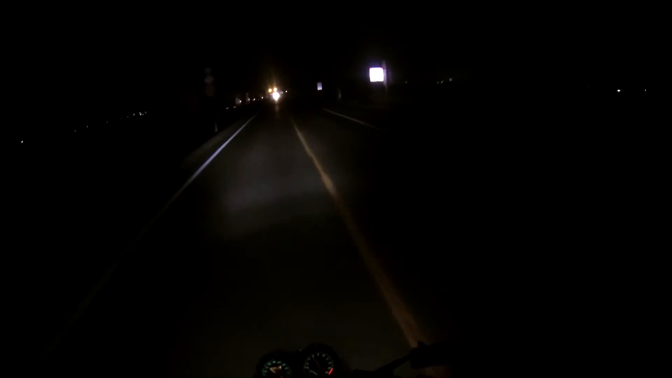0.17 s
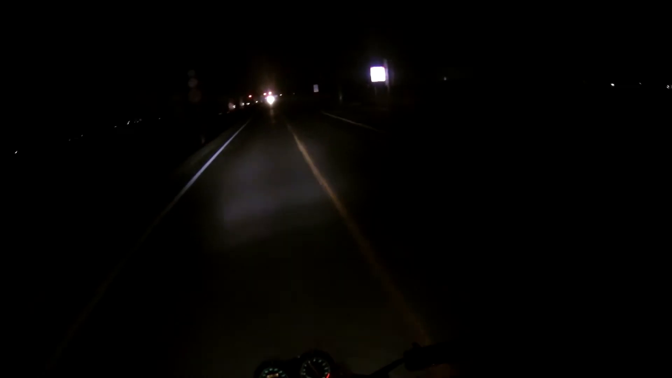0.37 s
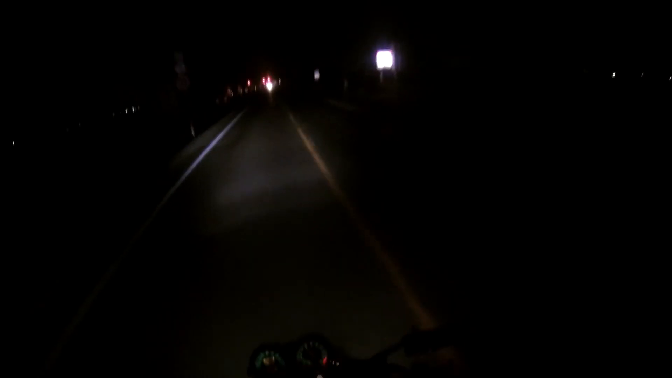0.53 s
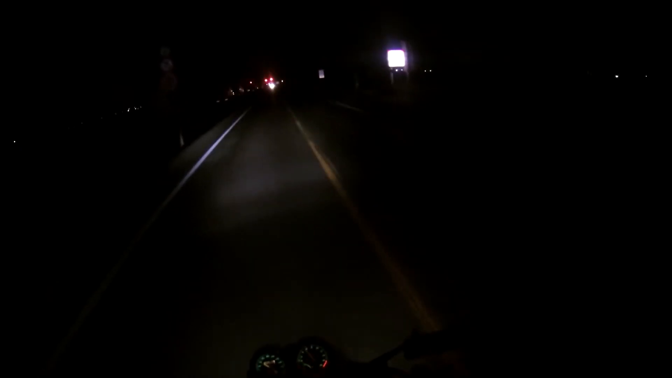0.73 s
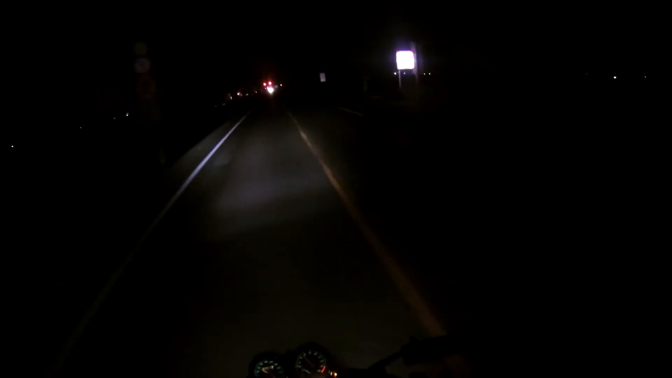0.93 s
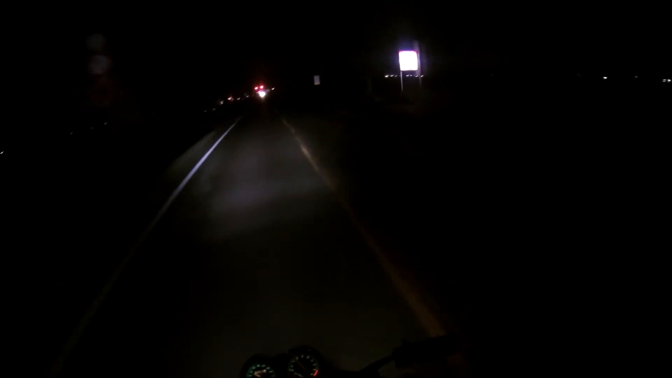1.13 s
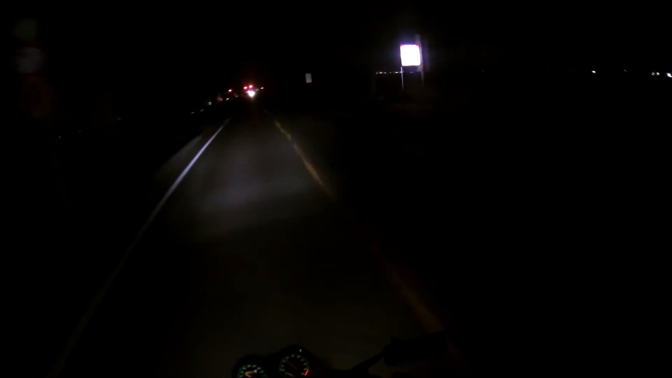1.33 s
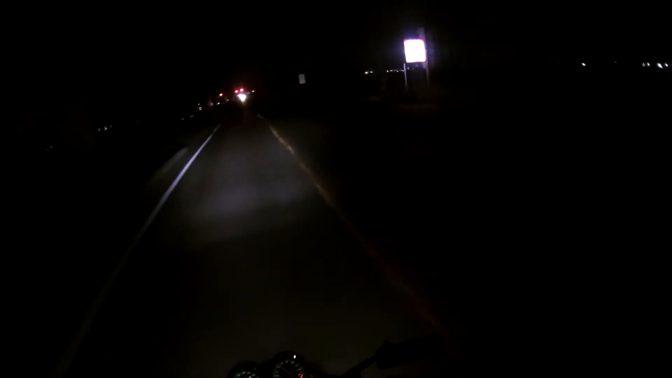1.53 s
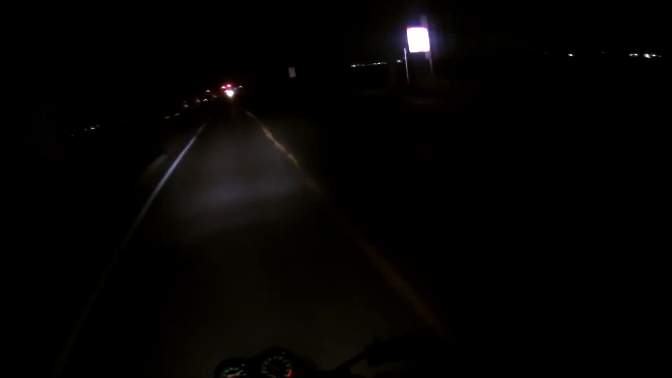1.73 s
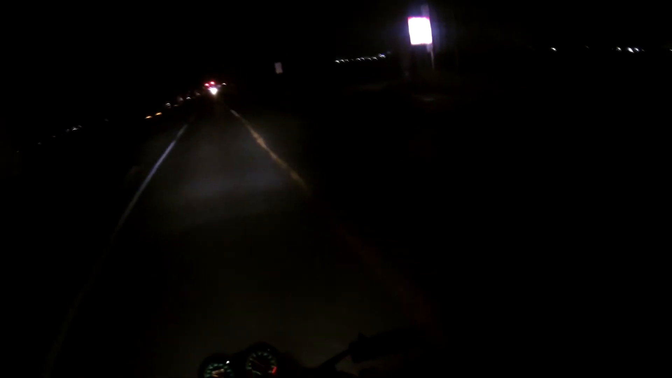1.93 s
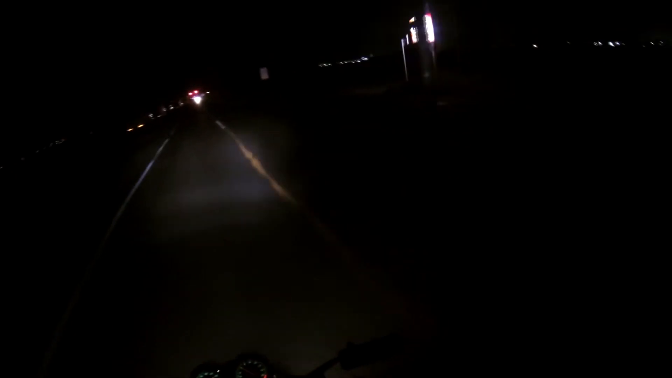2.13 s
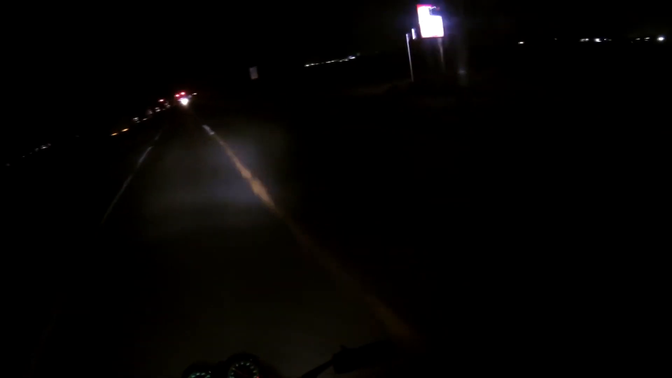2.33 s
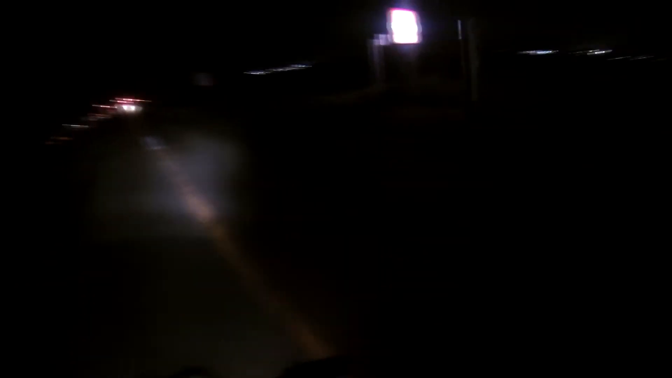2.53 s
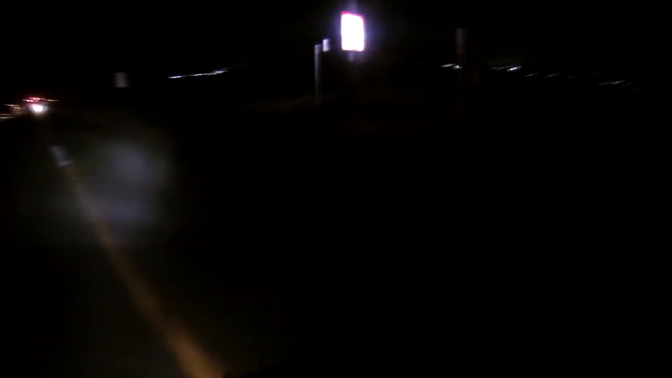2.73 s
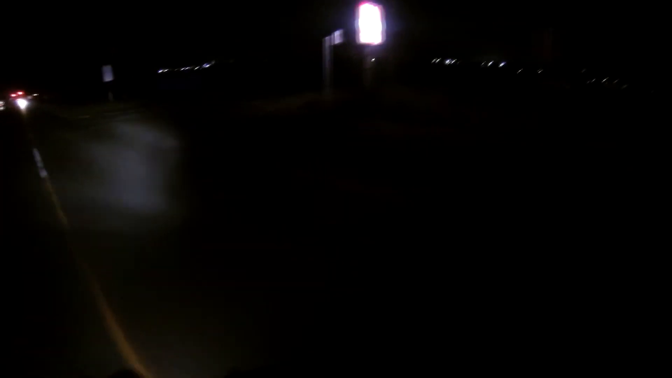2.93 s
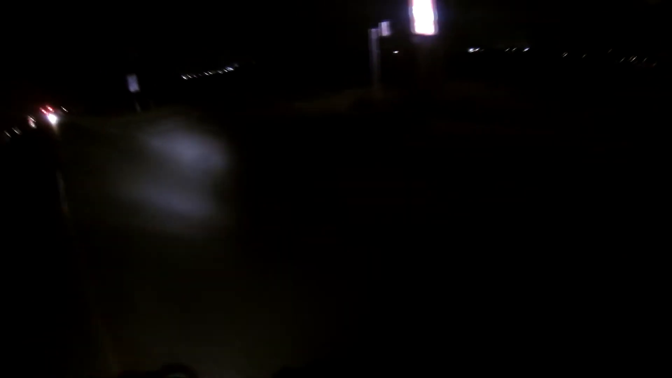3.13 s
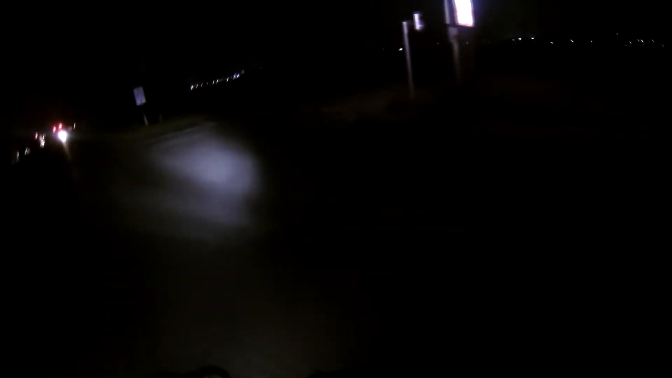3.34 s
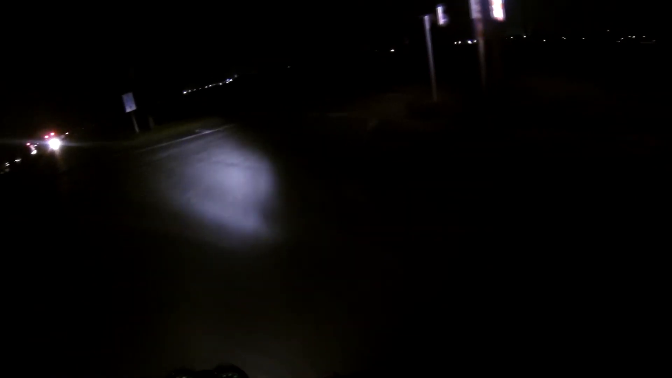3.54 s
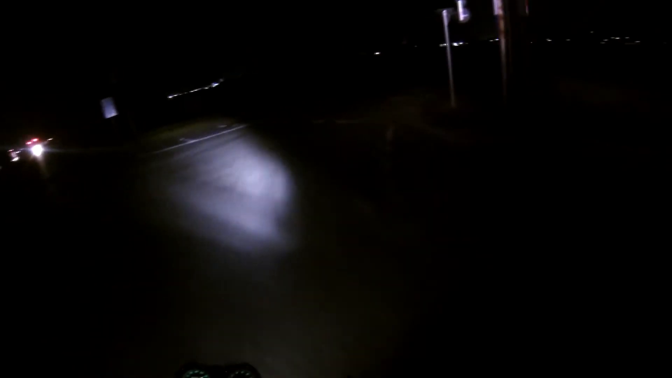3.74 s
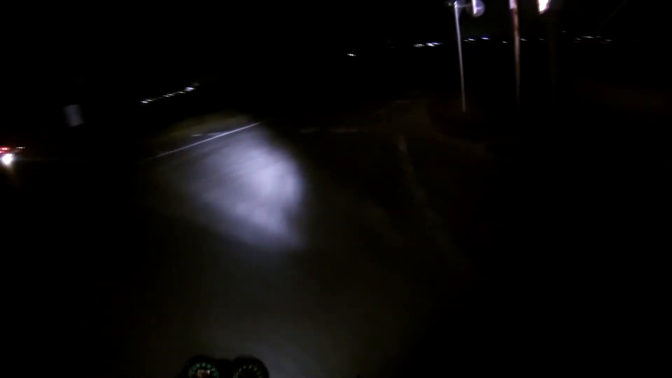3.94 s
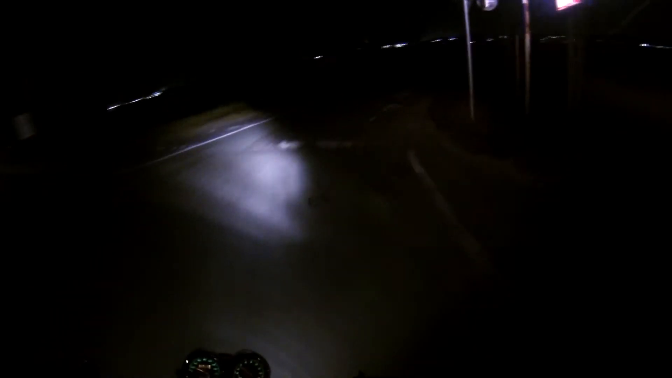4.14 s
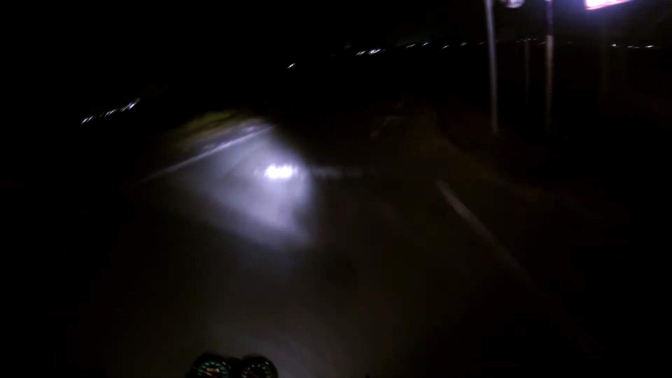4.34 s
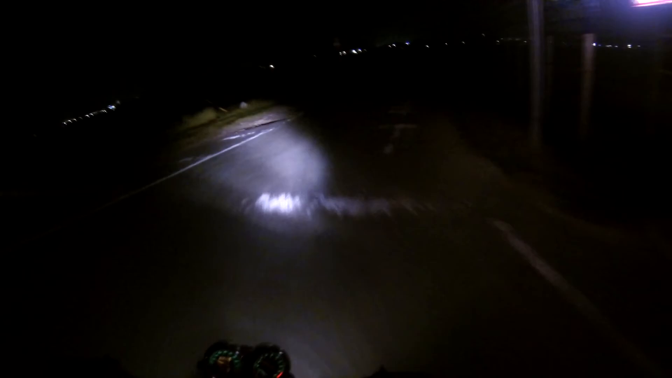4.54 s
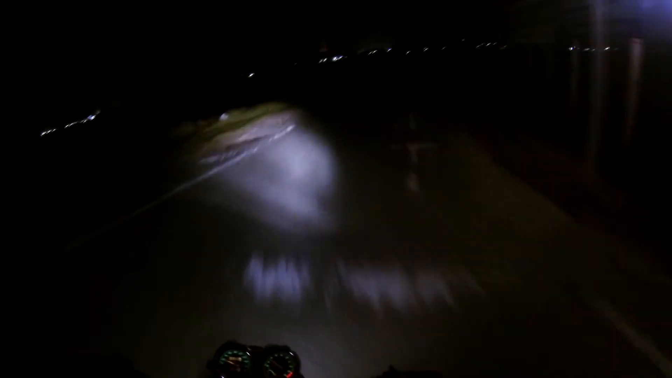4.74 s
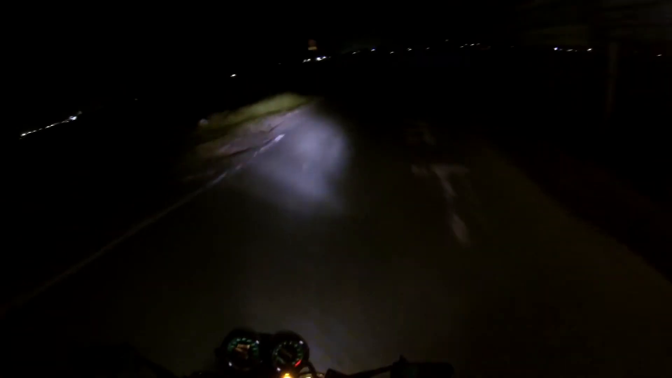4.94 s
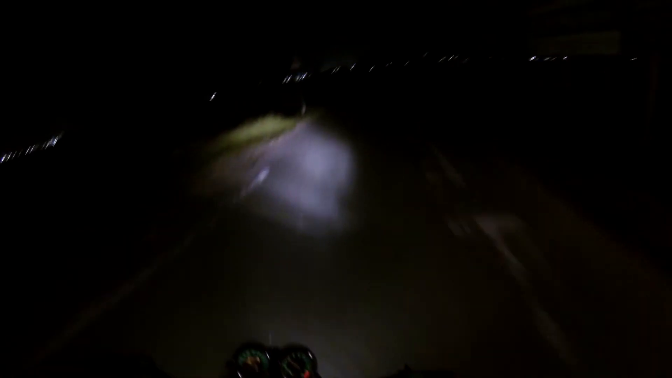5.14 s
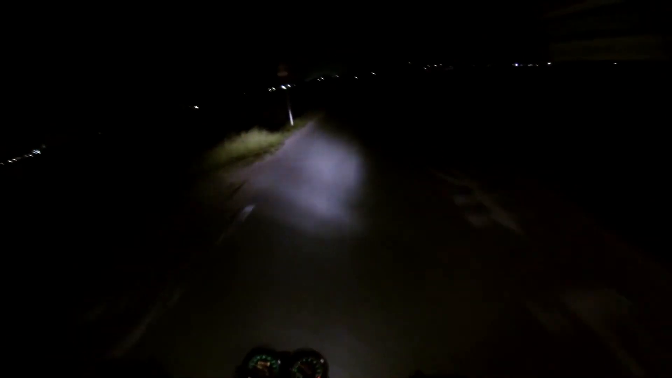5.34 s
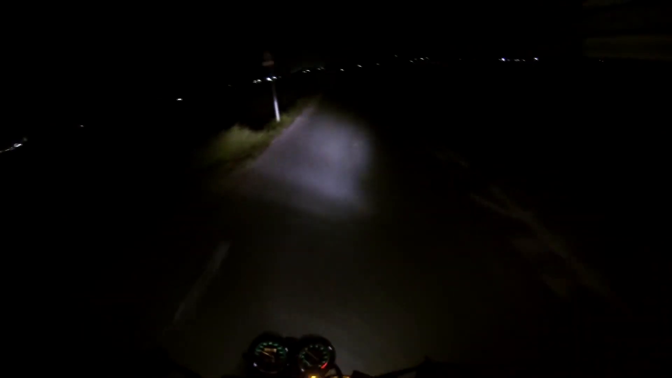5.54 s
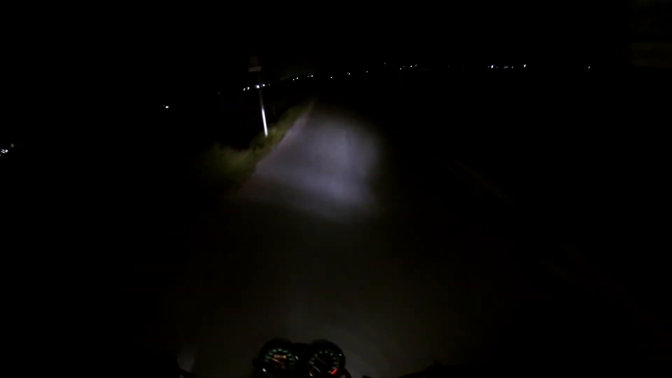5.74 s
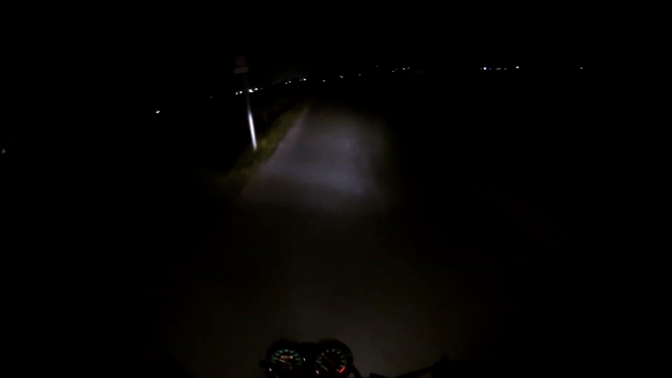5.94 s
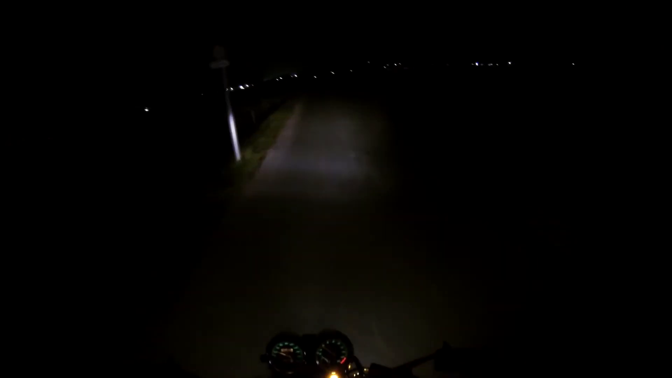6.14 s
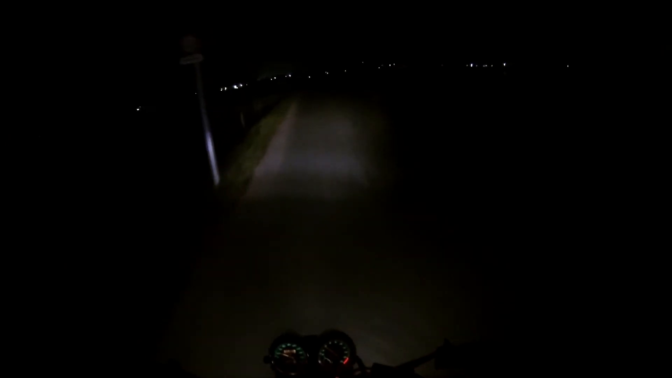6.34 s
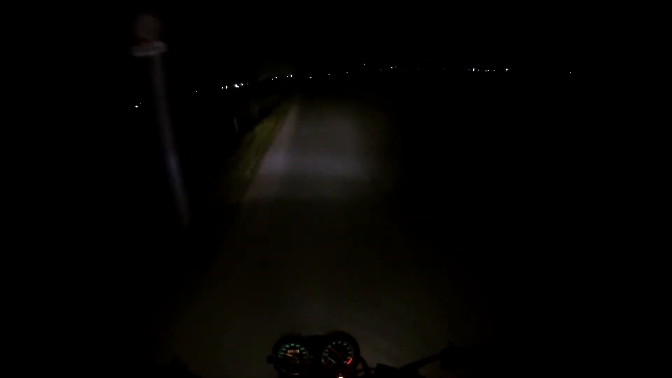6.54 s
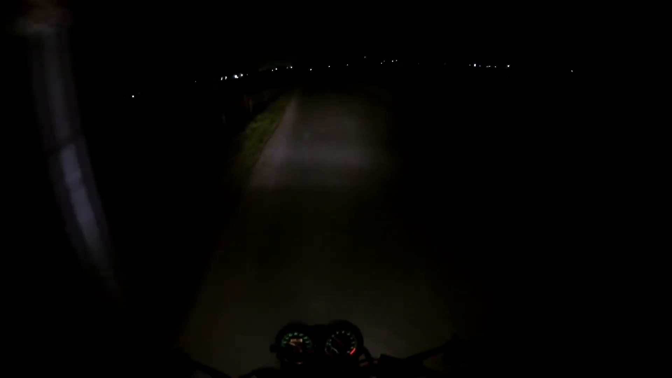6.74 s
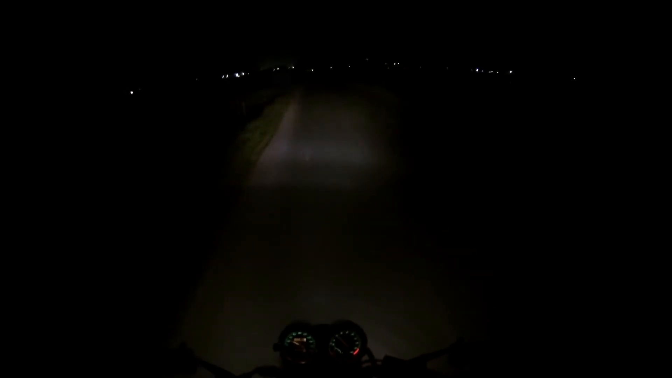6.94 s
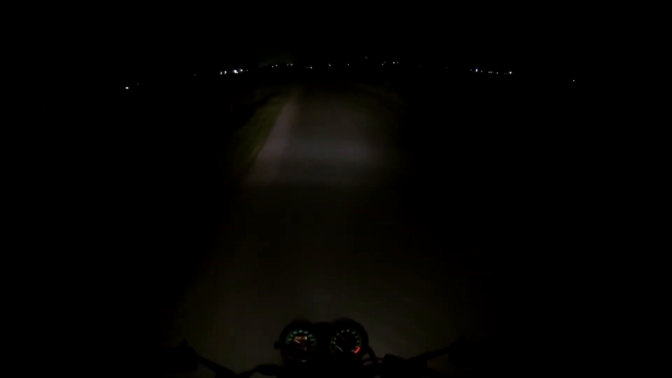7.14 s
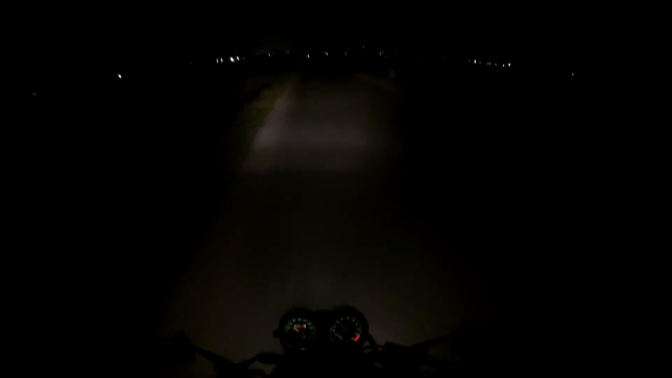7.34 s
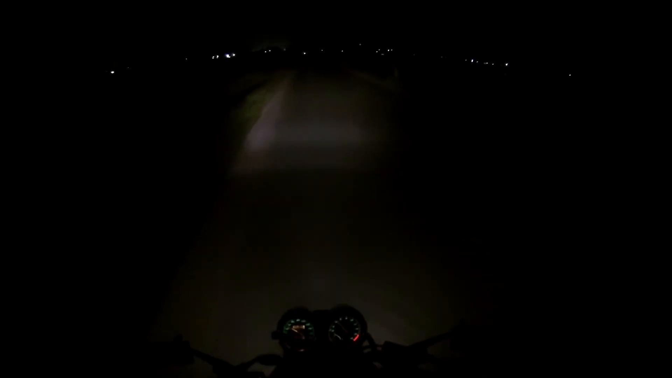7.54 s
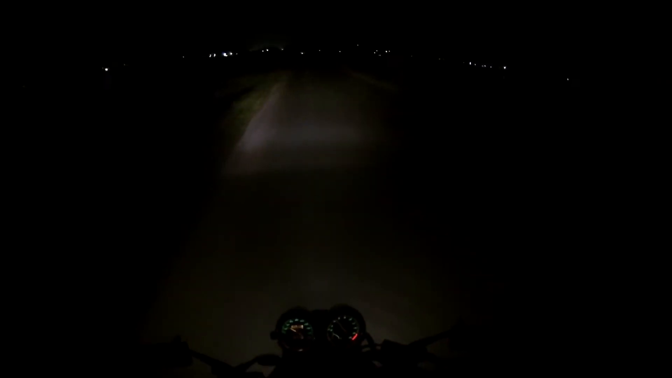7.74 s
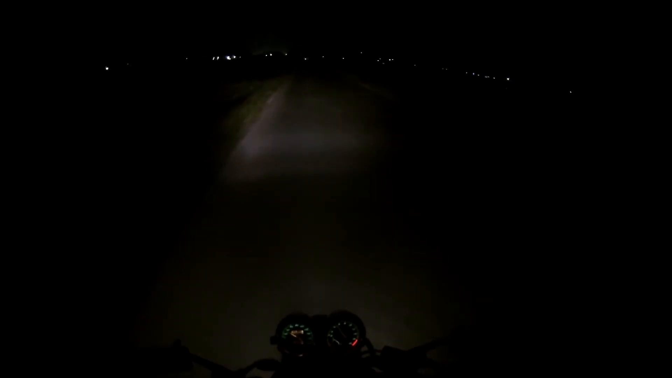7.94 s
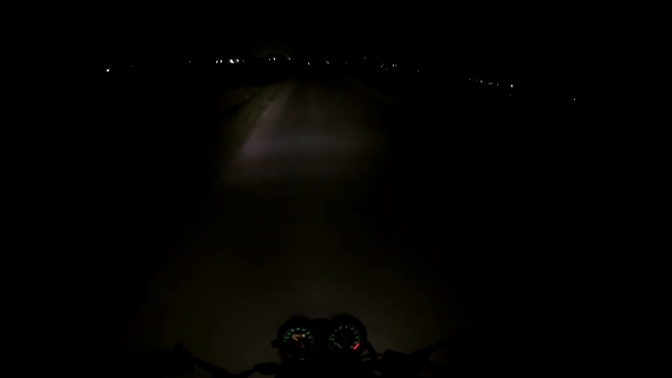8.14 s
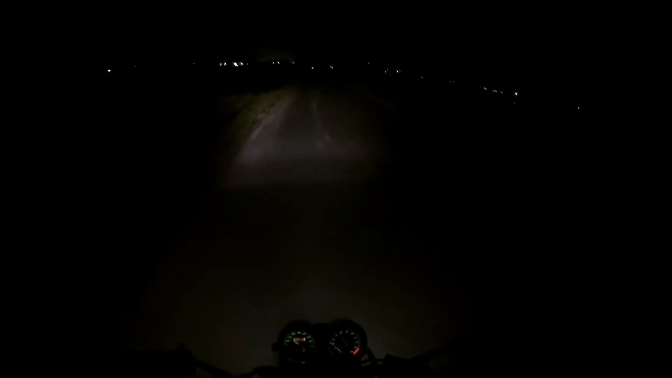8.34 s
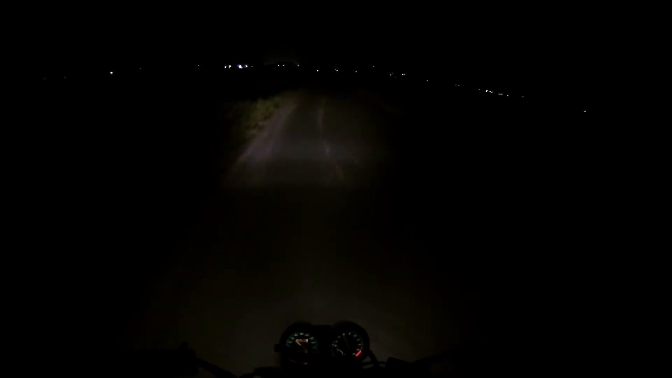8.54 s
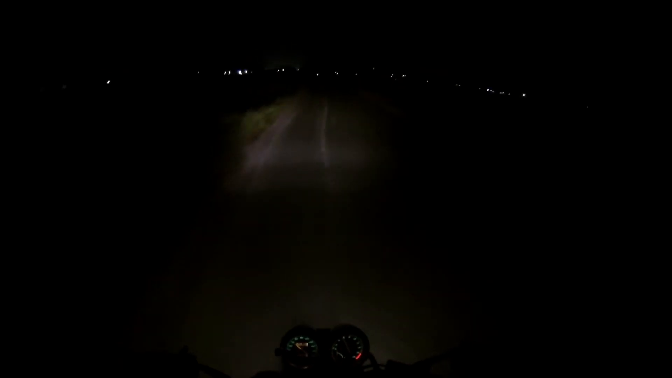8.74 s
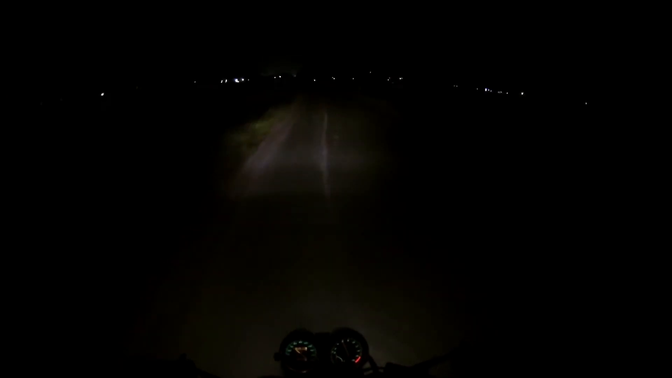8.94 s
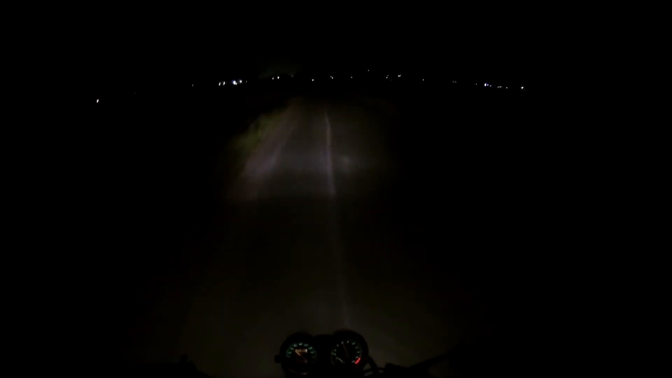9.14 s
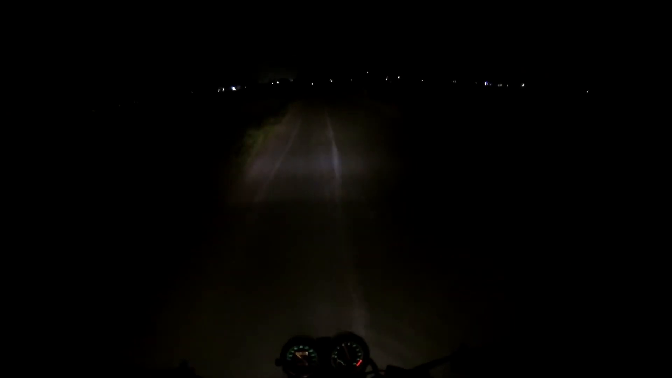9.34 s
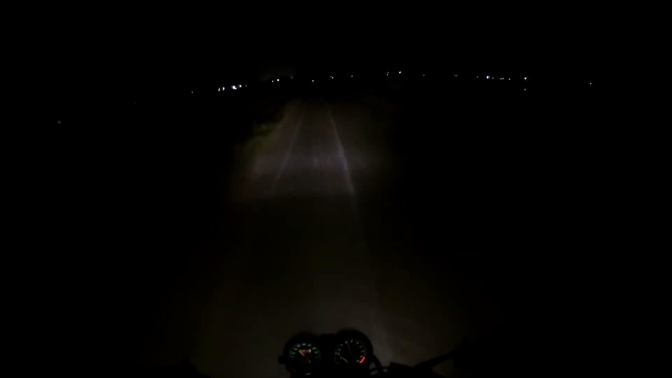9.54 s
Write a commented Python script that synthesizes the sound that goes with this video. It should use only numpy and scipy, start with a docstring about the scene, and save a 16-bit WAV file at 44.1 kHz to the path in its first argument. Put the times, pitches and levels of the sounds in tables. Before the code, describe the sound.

From the rider's helmet: wind rush fades as a motorcycle coasts down with a burbling exhaust, jerks lightly onto the throttle and accelerates smoothly.

```python
"""On the road, at the rider's helmet: a four-cylinder motorcycle coasts down into a turn, takes up the throttle
with a small jerk and pulls steadily away in one gear. Pulses of firing ring the exhaust, air box and hard
edge; gear tones whine, noise clatters as valves, and random knocks chink as the chain. Shaped noise makes
the wind's hiss and buffets and a soft brake rub. Brief tones sound, and one sharp tick on leaving the turn."""
import sys
import numpy as np
from scipy import signal
from scipy.fft import rfft, irfft
from scipy.io import wavfile
from scipy.ndimage import uniform_filter1d

SR = 44100
rng = np.random.default_rng(int(sys.argv[2]) if len(sys.argv) > 2 else 0)


def dump(signal):
    """Clip the signal to [-1, 1] and save it as 16-bit WAV at the path in sys.argv[1]."""
    limited = np.clip(np.atleast_2d(signal).T, -1, 1)
    pcm = np.round(limited * 32767).astype(np.int16)
    wavfile.write(sys.argv[1], SR, pcm)


N = 426888
T = np.arange(N) / SR  # time, s

# engine speed, jerking as the throttle takes up the slack of the chain: time_s, firing_rate_hz
ENGINE_SPEED = [(0, 184.6), (0.9, 160.9), (1.7, 137.2), (2.45, 122.8), (2.9, 118.4), (3.4, 110.9),
                (4.38, 105.6), (4.52, 116.4), (4.58, 101.4), (4.67, 108.1), (5.05, 110.2), (5.7, 117.6),
                (6.4, 127.8), (7.2, 146.1), (8.3, 173.6), (9.68, 207.2)]
# twist grip: time_s, throttle_0_to_1
TWIST_GRIP = [(4.15, 0.01), (4.5, 0.54), (5.1, 0.62), (5.9, 0.77), (6.7, 0.89), (8.2, 0.68), (9.68, 1)]
# air rushing round the helmet: frequency_hz, density_db_per_hz
HELMET_HISS = [(300, -27.5), (620, -10.5), (950, -18.5), (1310, 0), (1560, 0.5), (1870, -15), (2220, -8),
               (2650, -18), (3200, -13.5), (4400, -32.5), (5150, -22.5), (6400, -36.5), (8000, -41),
               (15000, -59)]
# eddies on the microphone: frequency_hz, density_db_per_hz
MICROPHONE_EDDIES = [(20, -13.5), (45, -5.5), (65, 1), (88, 10), (115, -14.5), (160, -11), (290, -14.5),
                     (380, -13), (470, -18.5), (700, -36.5), (4000, -100)]
# slow sway of pressure under the eddies: frequency_hz, density_db_per_hz
PRESSURE_SWAY = [(5, -11), (10, 5.5), (15, 10.5), (21, -1), (42, -9.5), (70, -20.5), (400, -100)]
# gusts striking the microphone: middle_s, length_s, extra_eddies_db, extra_sway_db
WIND_GUSTS = [(0.071, .16, 2.5, 3), (0.35, 0.16, -1.5, 2), (.63, 0.17, 2, 0.5), (0.934, 0.2, 3, 1.5),
              (1.348, 0.17, 2.5, 4), (1.726, 0.86, -0.5, 8.5), (2.049, 0.16, 7.5, -2.5),
              (2.677, 0.23, 5, -2), (3.22, 0.37, 2.5, 1), (4.6, 1.0, -5, 7), (4.719, .12, 4, 0.5),
              (5.8, .16, 7.5, 6), (6.05, .4, -2.5, 5), (6.898, 1.055, 0, 3), (8.35, .3, 3.5, -4),
              (9.0, 2.8, 5, -1), (9.599, .25, -1, 6.5)]
# brake disc under its pads: frequency_hz, density_db_per_hz
BRAKE_DISC = [(1500, -33), (2050, -10), (2270, 0), (2550, 0), (2950, -1), (3500, -13), (8000, -36)]
# a small hard object ticks and rebounds more softly: start_s, blow_db, contact_s
TICK_BLOWS = [(5.3113, -21, .00007), (5.3138, -25.5, .0003), (5.3165, -35, .0003)]
# modes of that object: pitch_hz, level_db, t60_s
OBJECT_MODES = [(1380, 6, .022), (1680, 9, .01), (2150, 19, .0065), (2850, 12, .007), (7650, -2, .004),
                (9800, -1, .003)]
# brief metallic tones near 2.2 kHz, then a very short burst of tone near 1.4 kHz as the engine pulls:
# middle_s, length_s, pitch_hz, level_db
BRIEF_TONES = [(2.417, 0.04, 2240, -49), (2.457, 0.035, 2295, -48), (2.957, 0.035, 2260, -48),
               (6.56, .08, 2122, -53), (6.94, .07, 2118, -43), (7.003, .08, 2128, -40.5),
               (7.06, .065, 2122, -42.5), (9.588, .005, 1380, -19.5)]
# links of the drive chain: frequency_hz, gain_db
CHAIN_LINKS = [(3000, -30), (6000, -12), (8200, -6), (9100, 0), (9700, -9), (11500, -11), (15000, -28)]
# engine casing as it reaches the helmet: frequency_hz, density_db_per_hz
ENGINE_CASING = [(300, -40), (600, -4.5), (1050, -6), (1450, -18), (1920, -28.5), (2200, 0), (2600, -41.5),
                 (3300, -7), (4400, -23.5), (5300, -20), (6600, -24), (7600, -31), (11000, -37.5),
                 (15000, -46.5)]
# gear mesh and cam drive, loading one tooth flank coasting and the other pulling:
# multiple_of_firing_rate, coasting_db, pulling_db
GEAR_TONES = [(29.9, -5, 0), (39.9, 1.5, 2), (44.6, -9, -3), (49.7, 0, 1), (59.8, -1, -1.5)]
# gearbox cover, in whose resonances the whine blooms and fades: frequency_hz, gain_db
GEARBOX_COVER = [(2700, -25), (3300, -18), (4200, -31), (4400, -36), (4550, -30), (4800, -32), (5050, -23),
                 (5300, -18), (5500, -27), (5720, -20), (5950, -27), (6200, -23), (6450, -25), (6800, -28),
                 (7400, -36), (8200, -27.5), (8700, -35), (10000, -48), (15000, -72)]
# parts that an engine tone sets singing: multiple_of_firing_rate, resonance_hz, width_hz, level_db
SINGING_PARTS = [(15, 2105, 110, -49.5), (15, 1930, 50, -56), (11, 1365, 90, -49), (10, 1378, 70, -44),
                 (8, 1140, 50, -47), (7, 1422, 70, -28.5), (7, 1285, 110, -39), (7, 955, 30, -52),
                 (6, 1150, 80, -38), (6, 1000, 90, -48), (5, 840, 70, -44.5), (4, 590, 70, -42),
                 (4, 690, 170, -48)]
# colour of the hard edge of the firings: frequency_hz, gain_db
HARD_EDGE = [(400, -19.5), (560, -10), (680, -5), (800, -8), (900, -10.5), (980, -4), (1060, -6),
             (1145, 2.5), (1210, -3.5), (1320, 2.5), (1560, -0.5), (1700, -5.5), (1900, -22), (2130, -22),
             (2600, -32), (8000, -65)]
# air box as it honks: frequency_hz, gain_db
HONKING_AIR_BOX = [(100, -46.5), (420, -16), (520, -5.5), (620, 1), (720, -10), (800, -10), (900, -10),
                   (1000, -6.5), (1300, -32.5), (4000, -82)]
# exhaust under load as it reaches the helmet: frequency_hz, gain_db
PIPE_PULLING = [(60, 5), (110, 1), (200, 3.5), (250, 6), (282, -2), (305, -29), (333, 3.5), (352, 9.5),
                (400, 13.5), (425, 6), (475, -17), (530, -12), (600, -12), (720, -16.5), (790, -20),
                (870, -34.5), (1000, -34), (4000, -100)]
# pipe with the throttle shut, cooler and duller but for its main resonance: frequency_hz, gain_db
PIPE_SHUT = [(60, 1.5), (110, -0.5), (185, 2), (215, -3.5), (240, -0.5), (278, -8.5), (300, -2), (316, -5),
             (332, 2.5), (365, 9), (392, 3.5), (425, -17), (540, -30), (700, -17.5), (1000, -34),
             (4000, -100)]
# faint steady high whistle: pitch_hz, rms_db
HIGH_WHISTLE = [(12618, -84), (12678, -87)]

SLOW_HZ = 108  # reference firing rate for levels; each rise_db is growth for a doubling of speed
METRES_PER_FIRING = .11  # road covered in this gear
HEADWIND_M_S, TURN_START_S, TURN_LENGTH_S = 2.5, 0.39, 3.25  # the bike turns out of the headwind
TICK_BUILD_S = .00035
CHAIN_DB, CHINKS_PER_S = -81, 45  # average chinks a second; throttle sets only their strength
WHINE_DB, BACKLASH_FIRINGS, PATCHY_DB = -66.7, .0058, 3.7
BUZZ_BLUR_RAD, BUZZ_FLUTTER_DB = .6, 2.3
SHAKE_HZ, SHAKE_SPAN_HZ = 139.7, 10  # firing rate at which the engine shakes in its frame, and its span
PUFF_DB, THROB, THROB_STRAY_RAD = -37.8, .45, .7
TOP_HZ = 15100


def undb(db):
    """Decibels to gain."""
    return 10 ** (np.asarray(db) / 20)


def curves(table):
    """Draw each column of a time table as a curve, one value a sample."""
    s, *columns = np.transpose(table)
    return [np.interp(T, s, c) for c in columns]


def unit(x):
    """Scale to rms 1."""
    return x / np.sqrt(np.mean(x ** 2))


def even(x):
    """Hold the slow level of a noise at rms 1, leaving its quick flutter."""
    return x / np.sqrt(uniform_filter1d(x ** 2, size=SR // 5))


def walk(rate):
    """Smooth chance with about `rate` new values a second, rms 1."""
    k = max(int(SR / rate), 2)
    steps = np.repeat(rng.standard_normal(N // k + 1), k)
    smooth = uniform_filter1d(uniform_filter1d(steps, k), k)
    return unit(smooth[:N])


def swell(x, middle, length):
    """A half sine from 0 up to 1 and back, `length` wide."""
    return np.cos(np.pi * np.clip((x - middle) / length, -.5, .5))


def doublings(hz):
    """Octaves of engine speed above the slow reference rate."""
    return np.log2(hz / SLOW_HZ)


def colour(x, points):
    """Causal (minimum-phase) filter through frequency and dB points."""
    size = 2 ** 19
    hz, db = np.transpose(points)
    bins = np.maximum(np.arange(size // 2 + 1) * SR / size, 1)
    gain_db = np.interp(np.log(bins), np.log(hz), db)
    # folding the cepstrum forward in time gives minimum phase
    cepstrum = irfft(np.log(undb(gain_db)))
    cepstrum[1:size // 2] *= 2
    cepstrum[size // 2 + 1:] = 0
    return irfft(rfft(x, size) * np.exp(rfft(cepstrum)))[:N]


def smear(x, t60=.04, db=0):
    """Tank, fairing and road reflect the sound: a short noise tail makes gliding partials swell and fade."""
    t = T[:SR // 20]
    tail = rng.standard_normal(len(t)) * undb(-60 * t / t60)
    tail /= np.sqrt(np.sum(tail ** 2))
    return x + undb(db) * signal.fftconvolve(x, tail)[:N]


def firings(turns, hz, scatter, cylinders_db):
    """One pulse a firing; each cylinder has its level, and each burn is a little stronger or weaker."""
    count = np.arange(1, int(turns[-1]))
    at = np.interp(count, turns, np.arange(N))
    i, part = at.astype(int), at % 1
    strength = 1 + scatter[i] * rng.standard_normal(N)[count]
    # a pulse as large as its period keeps the partials level as the revs change
    size = undb(np.resize(cylinders_db, len(i))) * strength * SR / hz[i]
    # share each pulse between two samples to place it exactly
    pulses = np.bincount(i, size * (1 - part), N) + np.bincount(i + 1, size * part, N)
    return (pulses - pulses.mean()) / np.sqrt(2)


def wind(hz, hiss_db=-50, hiss_rise_db=20.0, eddy_db=-44, eddy_rise_db=11, sway_db=-32.0,
         headwind_eddy_db=5.0, headwind_sway_db=8, flutter_db=0.64, buffet_db=0.1):
    """Hiss and eddies grow with airspeed; headwind and gusts shape the eddies and slow pressure sway."""
    facing = np.clip(1 - (T - TURN_START_S) / TURN_LENGTH_S, 0, 1)
    airspeed = METRES_PER_FIRING * hz + HEADWIND_M_S * facing
    faster = np.log2(airspeed / (METRES_PER_FIRING * SLOW_HZ))
    gust_eddy, gust_sway = sum(np.outer(extra, swell(T, s, length)) for s, length, *extra in WIND_GUSTS)
    hiss, eddies, sway = (unit(colour(rng.standard_normal(N), shape))
                          for shape in (HELMET_HISS, MICROPHONE_EDDIES, PRESSURE_SWAY))
    hiss_level = hiss_db + hiss_rise_db * faster + flutter_db * walk(45)
    eddy_level = eddy_db + eddy_rise_db * faster + headwind_eddy_db * facing + gust_eddy + buffet_db * walk(21)
    sway_level = sway_db + headwind_sway_db * facing + gust_sway
    return hiss * undb(hiss_level) + even(eddies) * undb(eddy_level) + sway * undb(sway_level)


def brake(level_db=-59, middle_s=2.2, length_s=2.0):
    """The pads rub softly on the disc: coloured noise that swells and fades."""
    rub = unit(colour(rng.standard_normal(N), BRAKE_DISC))
    return rub * swell(T, middle_s, length_s) * undb(level_db + 1.2 * walk(25))


def ticks():
    """Each blow rings the same few short modes; a longer contact sounds duller."""
    t = T[:SR // 20]
    ring = sum(undb(db - 60 * t / t60) * np.sin(2 * np.pi * hz * t) for hz, db, t60 in OBJECT_MODES)
    blows = np.zeros(N)
    for s, db, contact in TICK_BLOWS:
        push = swell(T, s, contact) ** 2
        blows += undb(db) * push / push.sum()
    ring = ring * (1 - np.exp(-t / TICK_BUILD_S)) ** 2  # the ring takes a moment to build
    # too small to radiate bass
    ring = signal.sosfilt(signal.butter(3, 1100, "high", fs=SR, output="sos"), ring)
    return signal.fftconvolve(blows, ring / np.abs(ring).max())[:N]


def brief_tones(flutter=0.27):
    """Short tones, roughened in level and phase, swell and fade."""
    out = np.zeros(N)
    for s, length, hz, db in BRIEF_TONES:
        tone = (1 + flutter * walk(190)) * np.sin(2 * np.pi * hz * T + flutter * walk(220))
        out += undb(db) * swell(T, s, length) * unit(tone)
    return out


def chain(throttle):
    """The taut chain chinks lightly on its sprockets: random knocks, stronger with throttle, ring the links."""
    knocks = (rng.random(N) < CHINKS_PER_S / SR) * throttle
    chinks = smear(knocks, t60=.06, db=20)
    return unit(colour(chinks, CHAIN_LINKS)) * undb(CHAIN_DB)


def machinery(turns, hz, throttle, clatter_db=-55.0, clatter_rise_db=8, load_db=2.9):
    """Valves clatter with every firing, louder with revs and load, and meshing gears whine faintly."""
    clatter = rng.standard_normal(N) * (1.5 + np.exp(-(turns % 1) / 0.3))
    clatter_level = clatter_db + clatter_rise_db * doublings(hz) + load_db * throttle
    clatter = unit(colour(clatter, ENGINE_CASING)) * undb(clatter_level)
    # the gears are tied to the road speed and hardly follow the jerk
    gear_turns = np.cumsum(uniform_filter1d(hz, size=SR // 4, mode="nearest")) / SR
    whine = np.zeros(N)
    for k, coasting, pulling in GEAR_TONES:
        # backlash blurs each mesh tone into a narrow band that comes and goes, the high ones most
        level = coasting + (pulling - coasting) * throttle + PATCHY_DB * np.tanh(walk(25))
        whine += undb(level) * np.sin(2 * np.pi * k * (gear_turns + BACKLASH_FIRINGS * walk(220)))
    whine = unit(colour(smear(whine, t60=0.076, db=-2.0), GEARBOX_COVER)) * undb(WHINE_DB)
    return (clatter + whine) * undb(0.59 * walk(35))


def buzzes(turns, hz, throttle, after_firing=0.12):
    """Under load a casing or panel sings, rough and fluttering, as an engine tone passes its resonance."""
    out = np.zeros(N)
    for k, centre_hz, width_hz, db in SINGING_PARTS:
        phase = 2 * np.pi * k * (turns - after_firing) + BUZZ_BLUR_RAD * walk(90)
        tone = np.sqrt(2) * np.sin(phase)
        response = 1 / (1 + (2 * (k * hz - centre_hz) / width_hz) ** 2)
        out += tone * response * undb(db + BUZZ_FLUTTER_DB * np.tanh(walk(35)))
    return out * throttle


def rasp(turns, hz, throttle, level_db=-57, rise_db=28, shut_db=-10, shake_db=4, jitter=0.019):
    """The sharp front of each firing grows with revs and throttle; unequal cylinders add lines between harmonics."""
    pulses = firings(turns + jitter * walk(70), hz, np.full(N, .18), cylinders_db=[5.0, -1.5, 1.0, -13.0])
    edge = unit(colour(smear(pulses, t60=0.018, db=-12), HARD_EDGE))
    shake = shake_db * swell(hz, SHAKE_HZ, SHAKE_SPAN_HZ)
    db = level_db + rise_db * doublings(hz) + shut_db * (1 - throttle) + shake
    return edge * undb(db + 0.46 * walk(18))


def intake(turns, hz, throttle, level_db=-44, from_hz=127, span_hz=16, jitter=0.015, waver_db=0.0,
           between=0.457):
    """With the throttle open the air box starts to honk as the revs pass into the midrange."""
    # the cylinders draw air between the firings
    gulps = firings(turns + between + jitter * walk(70), hz, np.full(N, .2),
                    cylinders_db=[-1.5, -2.2, 0.76, 0.71])
    on_song = np.clip((hz - from_hz) / span_hz, 0, 1)
    honk = colour(smear(gulps, t60=0.043, db=-8.0), HONKING_AIR_BOX)
    return honk * throttle * on_song * undb(level_db + waver_db * walk(16))


def burble(turns, hz, throttle, centre_hz=362, width_hz=84, rise_db=-14, chance=.35, late=0.32):
    """Off the throttle only some charges burn, late, and puff into the main resonance of the pipe."""
    burns = rng.random(N) < chance
    late_turns = turns + late
    puffs = firings(late_turns, hz, np.full(N, .15), cylinders_db=[0, 0, 0, 0])
    puffs = puffs * burns[np.round(late_turns).astype(int)]
    band = signal.butter(3, [centre_hz - width_hz / 2, centre_hz + width_hz / 2], "band", fs=SR, output="sos")
    # bursts come about every third engine cycle: twelve firings
    bursts = 1 + THROB * np.sin(2 * np.pi * turns / 12 + THROB_STRAY_RAD * walk(6.5))
    puffing = unit(even(signal.sosfilt(band, puffs)) * bursts)
    return puffing * undb(PUFF_DB + rise_db * doublings(hz)) * (1 - throttle)


def exhaust(turns, hz, throttle, load_db=-38.0, load_rise_db=7.0, coast_db=-44.5, coast_rise_db=14,
            coast_scatter=0.28, load_scatter=0.099, lope_db=-12):
    """Firings ring the pipe, louder with the revs: ragged and soft off the throttle, even and hard on it."""
    scatter = load_scatter + coast_scatter * (1 - throttle) ** 2
    pulses = firings(turns, hz, scatter, cylinders_db=[0.96, -0.63, -0.15, 0.37])
    # under load the two cylinder pairs pull unequally: a line at three times the crank rate
    lope = np.sqrt(2) * undb(lope_db + 2 * walk(20)) * np.sin(3 * np.pi * turns)
    pulling = colour(pulses + lope, PIPE_PULLING) * undb(load_db + load_rise_db * doublings(hz))
    coasting = colour(pulses, PIPE_SHUT) * undb(coast_db + coast_rise_db * doublings(hz))
    # the level wavers at random, more with the throttle shut
    waver_db = (0.06 + 0.3 * (1 - throttle)) * walk(22)
    return (throttle * pulling + (1 - throttle) * coasting) * undb(waver_db)


def scene():
    """Engine speed and throttle drive the engine, throttle the chain; the wind follows the road speed."""
    hz, = curves(ENGINE_SPEED)
    throttle = np.clip(curves(TWIST_GRIP)[0], 0, 1)
    turns = np.cumsum(hz) / SR  # firings so far
    surroundings = wind(hz) + brake() + ticks() + brief_tones()
    engine = sum(part(turns, hz, throttle) for part in (machinery, buzzes, rasp, intake, burble, exhaust))
    return (surroundings + chain(throttle) + engine)[None]


def record(dry):
    """Add a thin steady whistle and cut the top steeply."""
    whistle = sum(np.sqrt(2) * undb(db) * np.sin(2 * np.pi * hz * T) for hz, db in HIGH_WHISTLE)
    return signal.sosfilt(signal.ellip(8, .2, 70, TOP_HZ, fs=SR, output="sos"), dry + whistle)


dry = scene()
out = record(dry)
dump(out)
```